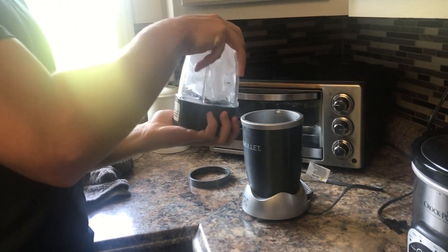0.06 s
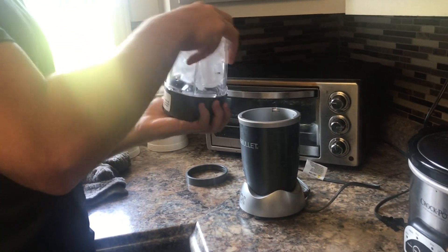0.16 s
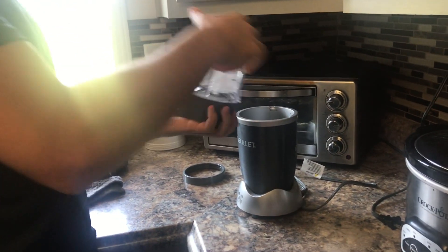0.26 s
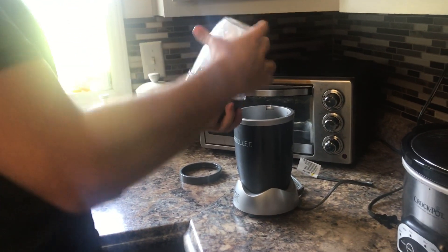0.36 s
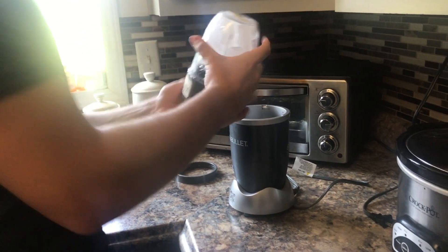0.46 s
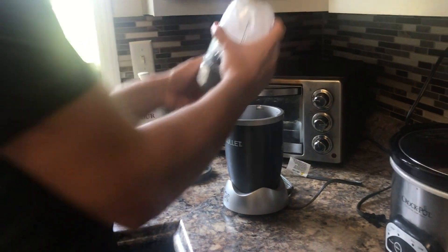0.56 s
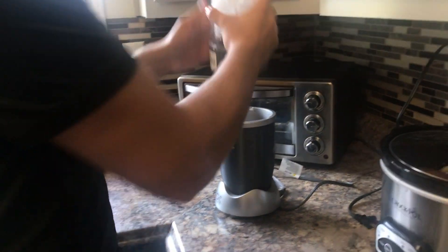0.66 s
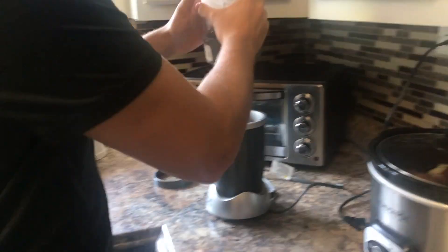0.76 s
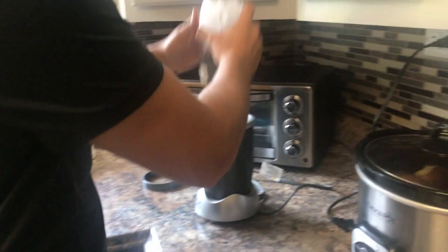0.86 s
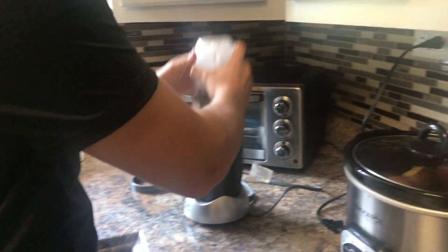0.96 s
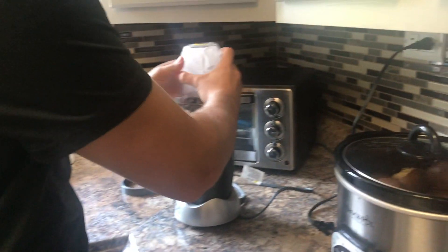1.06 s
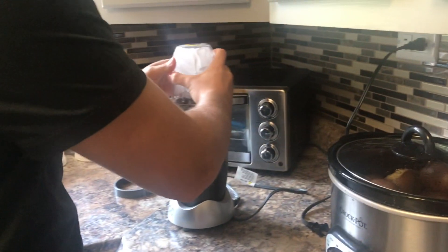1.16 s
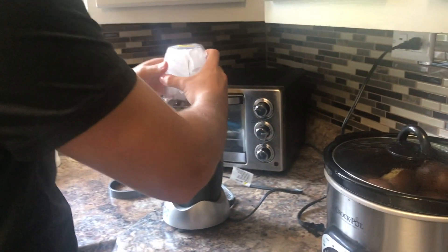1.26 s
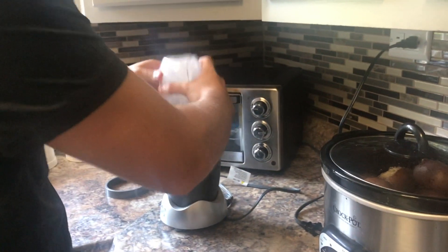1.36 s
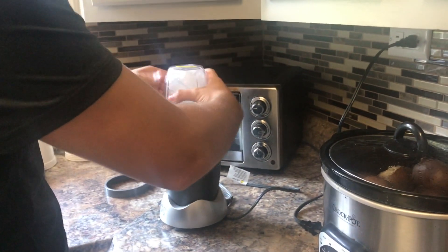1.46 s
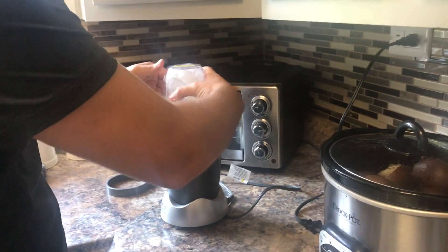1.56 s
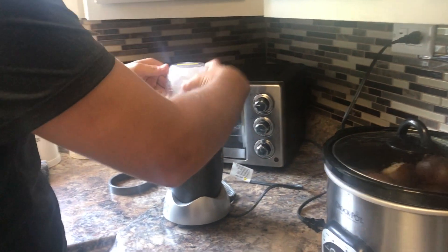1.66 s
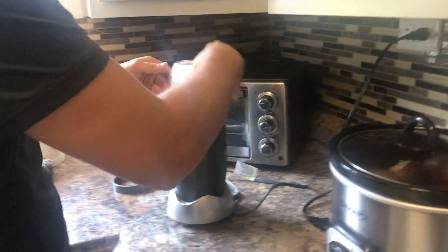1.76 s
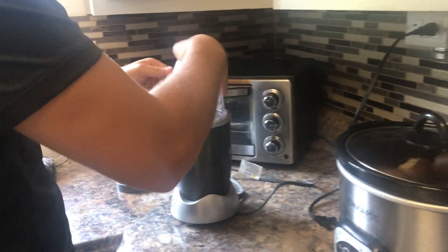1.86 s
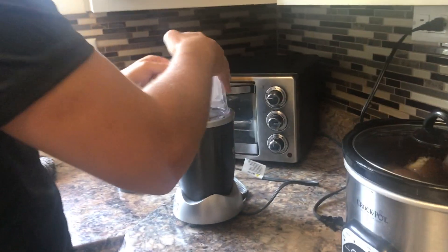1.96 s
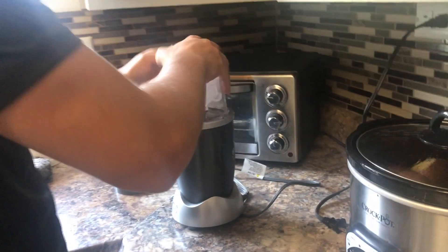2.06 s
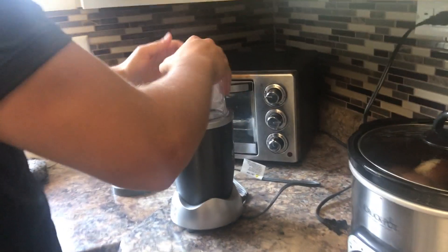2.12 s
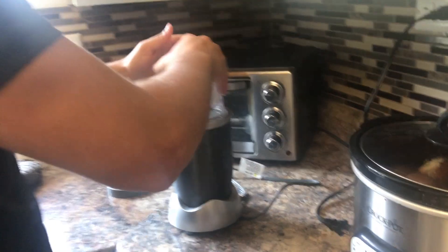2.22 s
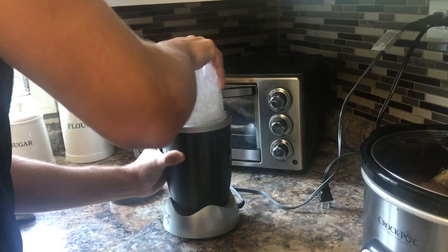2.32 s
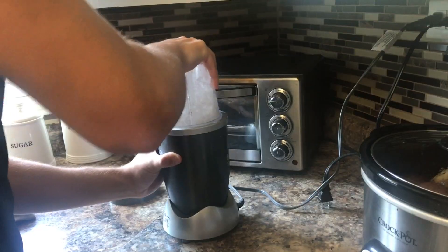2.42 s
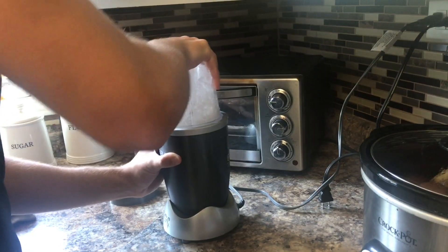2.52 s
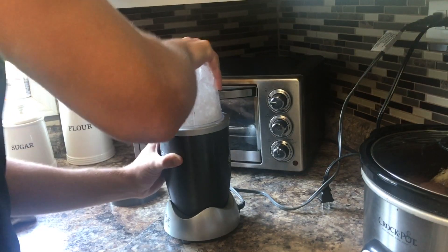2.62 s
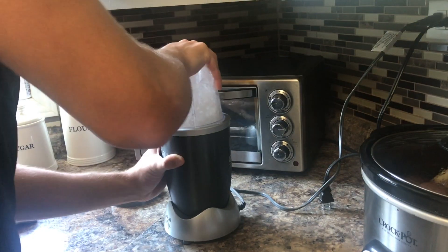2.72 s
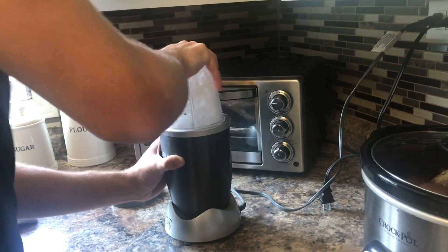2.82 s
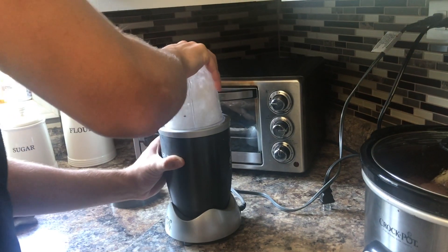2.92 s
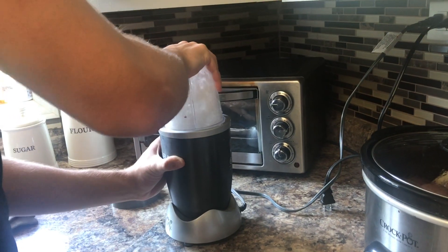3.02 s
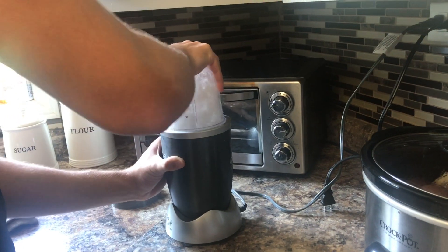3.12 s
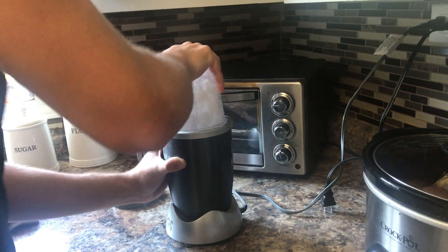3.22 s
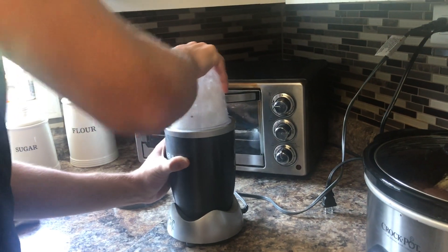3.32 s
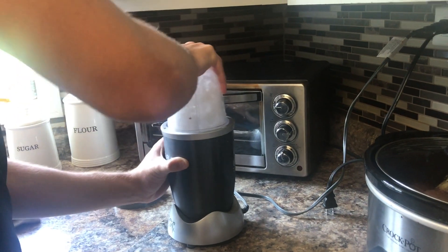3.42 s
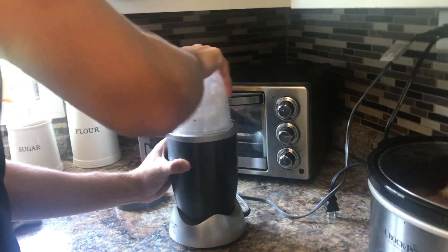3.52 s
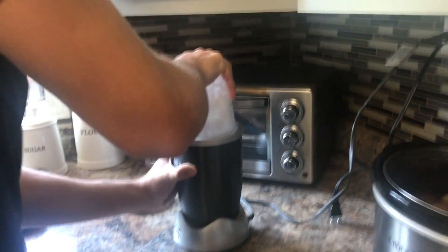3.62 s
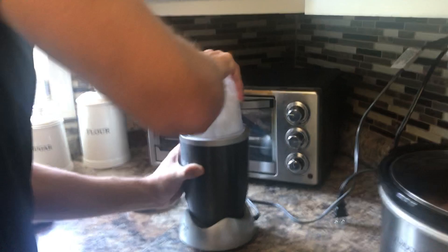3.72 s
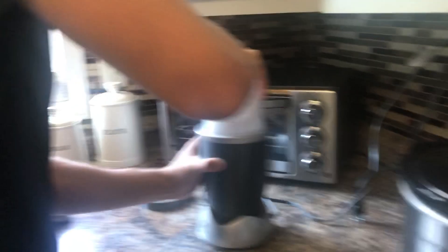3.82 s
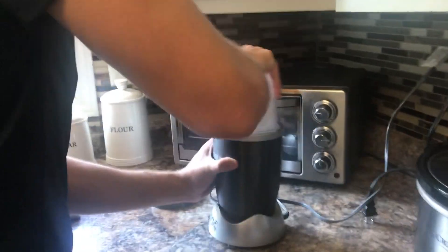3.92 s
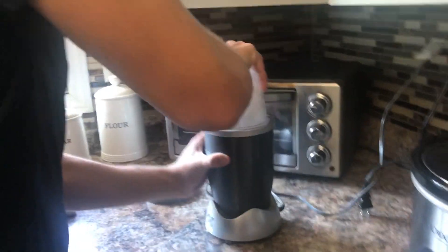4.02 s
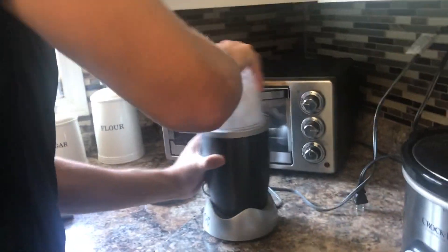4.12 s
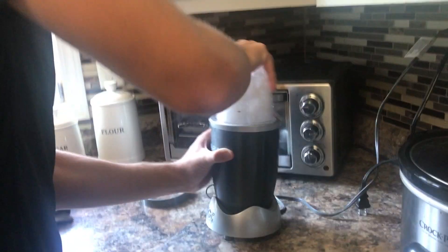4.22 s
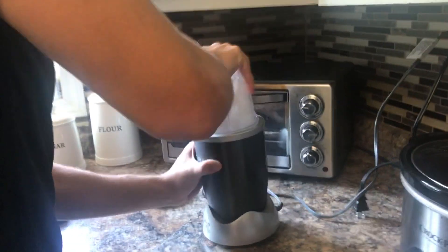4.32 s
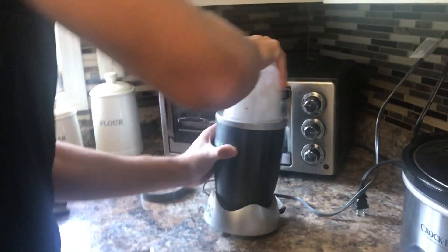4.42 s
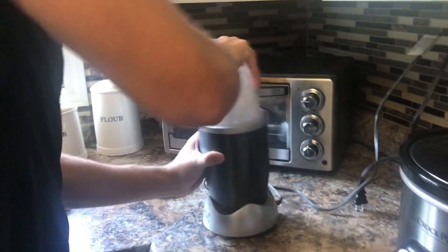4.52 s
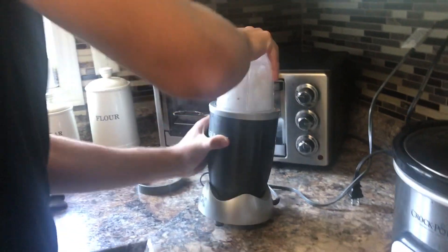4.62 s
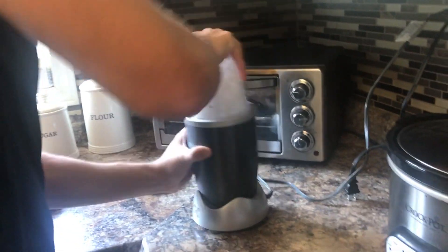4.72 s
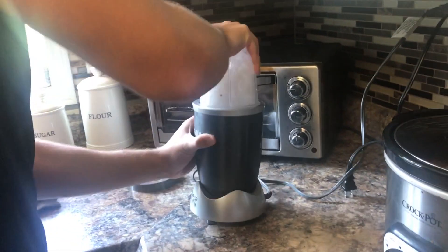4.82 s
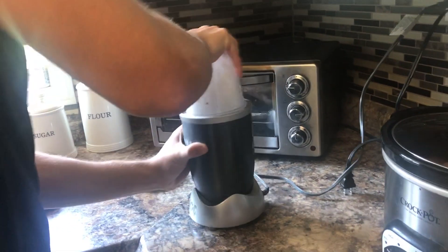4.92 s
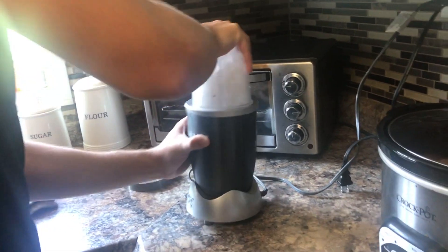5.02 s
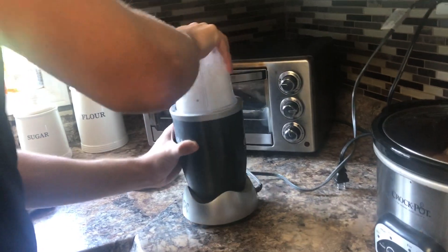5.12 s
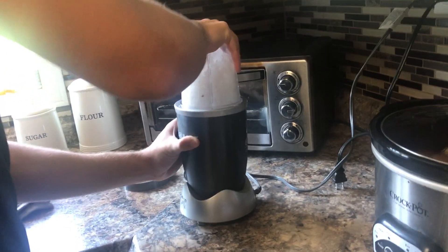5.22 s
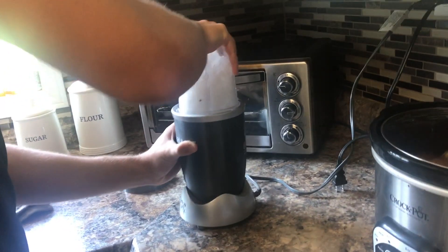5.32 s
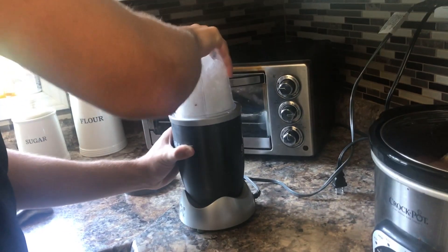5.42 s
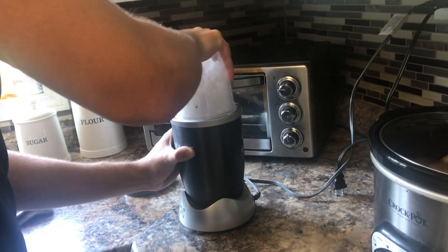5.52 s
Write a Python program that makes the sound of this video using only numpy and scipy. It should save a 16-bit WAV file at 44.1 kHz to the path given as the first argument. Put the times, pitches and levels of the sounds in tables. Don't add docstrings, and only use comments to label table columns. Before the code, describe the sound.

A quiet start: loose ice clacking in a cup, hands rubbing plastic, then sharp knocks and dull booms as it is seated on a small blender. A brief dip in sound precedes the last clicks. Then the motor roars for the rest, blades smashing cubes in irregular bursts, over buzzing plastic and fan noise. Reflective kitchen, one nearby phone microphone, slightly squashed at the loudest peaks.

```python
import sys
import numpy as np
from scipy import signal
from scipy.fft import rfft, irfft
from scipy.io import wavfile
from scipy.ndimage import uniform_filter1d

SR = 44100
rng = np.random.default_rng(int(sys.argv[2]) if len(sys.argv) > 2 else 0)


def inscribe(sig):
    pcm = np.round(np.clip(np.atleast_2d(sig).T, -1, 1) * 32767)
    wavfile.write(sys.argv[1], SR, pcm.astype(np.int16))


def decibels_to_gain(level_db):
    exponent = np.asarray(level_db, float) / 20
    return 10 ** exponent


N = 245777
TIME = np.arange(N) / SR
START_S, SPIN_UP_S = 2.833, 0.13
PUSH = np.hanning(40) / 20


def unit(x):
    return x / np.sqrt(np.mean(x ** 2))


def band(x, lo_hz, hi_hz):
    edges_hz = [lo_hz, min(hi_hz, 0.45 * SR)]
    return signal.sosfilt(signal.butter(2, edges_hz, "band", fs=SR, output="sos"), x)


def resonances(x, peaks):
    out = 0
    for k, (hz, width_hz, db) in enumerate(peaks):
        peak = signal.lfilter(*signal.iirpeak(hz, hz / width_hz, SR), x)
        out = out + (-1) ** k * decibels_to_gain(db) * peak / np.sqrt(width_hz)
    return unit(out)


def ring(x, modes):
    out = 0
    for hz, db, t60 in modes:
        pole = np.exp(2j * np.pi * hz / SR - np.log(1000) / (t60 * SR))
        out = out + decibels_to_gain(db) * signal.lfilter([1], [1, -pole], x).imag
    return out


def coloured(points):
    hz, db = np.transpose(points)
    f = np.arange(N // 2 + 1) * SR / N + 1
    shape = decibels_to_gain(np.interp(np.log(f), np.log(hz), db))
    return unit(irfft(rfft(rng.standard_normal(N)) * shape, N))


def walk(rate):
    k = int(SR / rate)
    return unit(uniform_filter1d(uniform_filter1d(rng.standard_normal(N), k), k))


def swells(table, col, rest_db):
    bumps = sum(decibels_to_gain(r[col]) * np.exp(-((TIME - r[0]) / r[1]) ** 2) for r in table)
    return 20 * np.log10(decibels_to_gain(rest_db) + bumps)


def add(out, s, sound):
    i = int(s * SR)
    out[i:i + len(sound)] += sound[:len(out) - i]


def clack(db, hz, treble_db, spread, grit, bite, ring_s, crack_s, rise_s, rebound, modes=()):
    t = np.arange(3000) / SR
    offsets = np.array([-0.68, -0.4, 0.04, -0.15, 0.43]) + 0.12 * rng.standard_normal(5)
    ratios = 2 ** (spread * offsets)
    if len(modes):
        ratios = np.array(modes) / hz * (1 + 0.016 * rng.standard_normal(len(modes)))
    body = np.zeros(len(t))
    for r in ratios:
        tone = np.sin(2 * np.pi * (hz * r * t + rng.random())) * np.exp(-t * r / ring_s)
        body += tone * decibels_to_gain(-5 * abs(np.log2(r))) / 2
    scrape = band(rng.standard_normal(len(t)), hz / (1 + spread), hz * (1 + 1.05 * spread))
    scrape *= np.exp(-t / ring_s)
    crack = band(rng.standard_normal(len(t)), 2600, 12500) * np.exp(-t / crack_s)
    crack += bite * band(crack, 4900, 7360) + 0.5 * band(crack, 12900, 17000)
    hit = decibels_to_gain(db) * (body + grit * scrape) + decibels_to_gain(treble_db) * crack
    hit *= 1 - np.exp(-t / rise_s)
    lags = (SR * (0.003 + 0.012 * rng.random(2))).astype(int)
    return hit + rebound * (np.roll(hit, lags[0]) + np.roll(hit, lags.sum()))


# (f/Hz, level/dB per Hz)
KITCHEN_TONE = [(18, -41), (30, -31.5), (64, 13), (93, -2.5), (280, -5.5), (600, -7), (666, -15),
                (760, -12.5), (2980, -26), (16000, -45)]


def kitchen_tone():
    return decibels_to_gain(-58) * coloured(KITCHEN_TONE)


# (t/s, peak level/dB, ring f/Hz, treble level/dB)
CUBES = [(0.0004, -20, 2030, -39), (0.0095, -34, 1940, -55), (0.0382, -27.5, 1950, -59),
         (0.0972, -37, 2300, -34.5), (.108, -41, 2100, -48), (0.116, -50, 2380, -53),
         (0.148, -23, 2220, -30.5), (0.165, -51, 1770, -46), (0.191, -37, 1840, -40),
         (0.2133, -32, 1710, -41), (0.247, -30, 1750, -37), (0.26, -28.5, 1850, -38),
         (0.2994, -43, 1700, -50), (0.3368, -41, 1710, -51), (0.4892, -36.5, 1630, -49),
         (0.5035, -28, 2140, -34.5)]
CUP_WALL_HZ = [1106, 1346, 1813, 2010, 2187, 2410, 2560]


def cubes_in_cup():
    out = np.zeros(N)
    for s, db, hz, treble_db in CUBES:
        add(out, s, clack(db, hz, treble_db, spread=1.0, grit=0.74, bite=1.0, ring_s=0.0084,
                          crack_s=0.0034, rise_s=0.00053, rebound=0.2, modes=CUP_WALL_HZ))
    return out


# (t/s, half length/s, rub level/dB, level of weight on the counter/dB)
RUBS = [(0.005, 0.012, -61, -43), (0.19, 0.14, -59, -53), (0.53, 0.096, -55.5, -57), (0.8, 0.12, -58, -56),
        (1.25, 0.086, -69, -39), (1.4, 0.028, -78, -32), (1.44, 0.021, -52, -28),
        (1.495, 0.025, -43, -27.5), (1.6, 0.055, -66, -26.5), (1.76, 0.07, -72, -41.5),
        (1.98, 0.65, -77, -55), (2.36, 0.066, -74, -46), (2.49, 0.0092, -57.5, -36),
        (2.52, 0.061, -83, -52), (2.78, 0.12, -69, -40.5)]
# (f/Hz, width/Hz, level/dB)
PALM = [(1196, 390, -4), (1760, 210, 1), (2700, 250, -2), (3800, 540, 2), (4520, 500, -1.5),
        (6150, 400, -3)]
# (f/Hz, level/dB, t60/s)
COUNTER = [(56.3, 2, 0.24), (113.3, -0.5, 0.17)]
# (f/Hz, level/dB, t60/s)
BASE = [(192.6, 7.5, 0.14), (256, 15.5, 0.058), (364, 2.5, 0.12), (403, -3, 0.03), (635, -17, 0.047)]


def palms_on_cup():
    rub_db = swells(RUBS, col=2, rest_db=-76)
    rumble_db = swells(RUBS, col=-1, rest_db=-52.5)
    treble_db = -73 + (rub_db + 60.5)
    grain = band(rng.standard_normal(N) * decibels_to_gain(2.1 * walk(400)), 900, 7000)
    rub = decibels_to_gain(rub_db + 1.8 * walk(110)) * resonances(grain, PALM)
    rub += decibels_to_gain(treble_db + 2 * walk(37)) * unit(band(rng.standard_normal(N), 3460, 16000))
    weight = rng.standard_normal(N)
    shaken = unit(ring(weight, COUNTER)) + 0.56 * unit(ring(weight, BASE))
    rumble = decibels_to_gain(rumble_db - 7.5) * unit(shaken)
    return (rub + rumble) * (TIME < START_S)


# (t/s, peak level/dB, ring f/Hz, treble level/dB)
TICKS = [
    (0.4075, -46, 5840, -45),
    (1.872, -49, 5250, -47),
    (2.0542, -59, 3800, -65),
    (2.065, -50, 3750, -71),
    (2.7582, -26, 2910, -26.5),
    (2.7844, -45, 2980, -59),
]


def plastic_ticks():
    out = np.zeros(N)
    for s, db, hz, treble_db in TICKS:
        add(out, s, clack(db - 3, hz, treble_db, spread=0.14, grit=0.32, bite=-0.45, ring_s=0.0061,
                          crack_s=0.0029, rise_s=0.00039, rebound=0.14))
    return out


# (t/s, peak level/dB, ring f/Hz, treble level/dB, thud level/dB)
CLICKS = [(0.5519, -34.5, 1570, -44, -40), (0.573, -37, 2010, -59, -41), (0.583, -41, 1500, -58, -42.5),
          (1.052, -55, 2500, -58, -58), (1.1813, -33, 1000, -43, -32), (1.373, -43, 1610, -45, -57),
          (1.4198, -37.5, 1610, -49, -66), (1.4273, -39, 2300, -46, -64), (1.442, -41, 1920, -50, -66),
          (1.465, -36, 1940, -41, -60), (1.4875, -43, 2600, -32, -60), (1.6908, -49.5, 1290, -53, -41),
          (1.742, -43.5, 1070, -44.5, -46.5), (1.824, -55, 1110, -59, -47), (1.929, -51.5, 1710, -50, -56),
          (2.3164, -52, 1040, -66, -37), (2.372, -62.5, 1018, -65, -65), (2.4957, -47, 1220, -51, -52),
          (2.7848, -60, 2980, -56, -33.5)]


def cup_clicks():
    out, thud = np.zeros((2, N))
    for s, db, hz, treble_db, thud_db in CLICKS:
        add(out, s, clack(db, hz, treble_db, spread=0.77, grit=2.6, bite=0.76, ring_s=0.0059,
                          crack_s=0.003, rise_s=0.000333, rebound=0.32))
        add(thud, s, decibels_to_gain(thud_db - 8) * PUSH)
    return out + ring(thud, BASE)


# (t/s, peak level/dB, ring f/Hz, treble level/dB, thud level/dB)
KNOCKS = [
    (1.0817, -11.5, 1485, -21, -34),
    (1.514, -24, 1776, -22.5, -14),
    (2.1913, -31.5, 2740, -30, -22.5),
    (2.204, -25.5, 1067, -49, -45),
    (2.4913, -47, 1220, -52, -44),
    (2.7637, -45, 1460, -47, -55),
    (2.8417, -41, 2880, -18, -16.5),
]
# (f/Hz, level/dB, t60/s)
RIM = [(280, -17, 0.038), (405, 8.5, 0.059), (527, -8.5, 0.04), (774, -18, 0.019)]


def cup_knocks():
    out, rap = np.zeros((2, N))
    for s, db, hz, treble_db, thud_db in KNOCKS:
        add(out, s, clack(db, hz, treble_db, spread=1.306, grit=2.55, bite=-0.35, ring_s=0.007,
                          crack_s=0.0039, rise_s=0.00008, rebound=0.14))
        add(rap, s, decibels_to_gain(thud_db - 5.5) * PUSH)
    return out + band(ring(rap, RIM), 194, 1500)


# (t/s, thud level/dB, counter low mode level/dB, upper mode level/dB)
SETTLES = [
    (1.0896, -16.5, -14, -11),
    (1.5244, -18, -14.5, -36),
    (2.2022, -19.5, -28, -23),
    (2.4913, -49, -28, -33),
    (2.763, -63, -34, -39),
    (2.8437, -32, -30, -42),
]


def base_settles():
    thud, low, upper = np.zeros((3, N))
    for s, thud_db, low_db, upper_db in SETTLES:
        add(thud, s, decibels_to_gain(thud_db - 8) * PUSH)
        add(low, s, decibels_to_gain(low_db) * PUSH)
        add(upper, s, decibels_to_gain(upper_db) * PUSH)
    return ring(thud, BASE) + ring(low, COUNTER[:1]) + ring(upper, COUNTER[1:])


# (f/Hz, t60/s)
ROOM_T60 = [(150, 0.26), (600, 0.28), (2000, 0.38), (6000, 0.27), (14000, 0.18)]


def room(x, wet_db):
    out = x.copy()
    x = x[:int((START_S + 0.5) * SR)]
    t60_hz, t60_s = np.transpose(ROOM_T60)
    for hz in 150 * 2 ** (np.arange(14) / 2):
        lo_hz, hi_hz = hz / 2 ** 0.25, hz * 2 ** 0.25
        t60 = np.interp(np.log(hz), np.log(t60_hz), t60_s)
        keep = np.exp(-2 * np.log(1000) / (t60 * SR))
        energy = signal.lfilter([1 - keep], [1, -keep], band(x, lo_hz, hi_hz) ** 2)
        diffuse = unit(band(rng.standard_normal(len(x)), lo_hz, hi_hz))
        out[:len(x)] += decibels_to_gain(wet_db) * np.sqrt(energy) * diffuse
    return out


# (t/s, shaft f/Hz)
SHAFT = [(2.84, 121.2), (2.96, 149.2), (3.15, 213.3), (3.31, 213.5), (3.46, 227.8), (3.57, 219.7),
         (3.69, 206.8), (3.8, 220), (3.94, 226), (4.06, 208.4), (4.16, 218.7), (4.32, 256), (4.55, 266),
         (4.7, 274.4), (4.95, 281.4), (5.2, 281.2), (5.41, 263.4), (5.5, 238), (5.57, 239)]


def shaft():
    hz = np.interp(TIME, *np.transpose(SHAFT))
    turn = 2 * np.pi * np.cumsum(hz * (1 + 0.013 * walk(60) + 0.006 * walk(25))) / SR
    return hz, turn


# (t/s, half length/s, shaft tone level/dB, second order level/dB)
WOBBLES = [(2.95, 0.046, -37, -37), (3.06, 0.038, -29, -36), (3.16, 0.027, -25, -32),
           (3.37, 0.054, -29, -27), (3.58, 0.14, -39, -37), (3.78, 0.1, -34, -60), (4.1, 0.053, -30.5, -23),
           (4.23, 0.065, -30, -31), (4.38, 0.06, -28.5, -23), (4.5, 0.051, -34, -27.5),
           (4.72, 0.037, -36, -21.5), (4.8, 0.045, -29, -43), (4.6, 0.054, -39, -34),
           (4.94, 0.059, -43, -26), (5.03, 0.074, -41, -32), (5.14, 0.053, -41, -27.5),
           (5.26, 0.042, -37, -32), (5.42, .1, -26.5, -35.5), (5.52, 0.05, -31, -38)]


def shaft_tones(turn):
    first_db = swells(WOBBLES, col=2, rest_db=-36.5) + 3.4 * walk(74) + 1.35 * walk(29)
    second_db = swells(WOBBLES, col=-1, rest_db=-39.5) + 1.9 * walk(39)
    return decibels_to_gain(first_db) * np.sin(turn) + decibels_to_gain(second_db) * np.sin(2 * turn)


# (f/Hz, width/Hz, level/dB)
PANELS = [(1070, 230, -7), (2113, 205, 4.5), (3000, 150, -2.5)]
# (t/s, half length/s, level/dB)
SINGS = [(3.26, 0.038, -39), (3.45, 0.094, -32.5), (3.63, 0.057, -40), (3.85, 0.066, -34), (4.0, 0.06, -39),
         (4.4, .2, -39), (4.75, 0.081, -30), (4.93, 0.057, -27.5), (5.1, 0.1, -26), (5.28, 0.04, -32),
         (5.39, 0.072, -45)]


def panel_whine(hz):
    steady = 2 * np.pi * np.cumsum(hz * (1 + 0.018 * walk(90) + 0.006 * walk(30))) / SR
    orders = np.zeros(N)
    for k in range(4, 14):
        slot_db = 6 * (k == 10)
        orders += decibels_to_gain(2.5 * walk(70) + slot_db) * np.sin(k * steady)
    sung = resonances(resonances(orders, PANELS), PANELS)
    fade_in = np.clip((TIME - START_S) / SPIN_UP_S - 1, 0, 1)
    return decibels_to_gain(swells(SINGS, col=2, rest_db=-47)) * sung * fade_in


# (f/Hz, level/dB per Hz)
AIR = [(350, -9.5), (600, -6), (880, -10), (1070, -2.5), (1190, -8.5), (1870, -6.5), (2110, -6),
       (2930, -5.5), (4870, -12), (9390, -19.5), (10500, -21.5), (13200, -24), (15800, -26.5)]


def cooling_air(hz, turn):
    fan = decibels_to_gain(-27 + 14.5 * np.log2(hz / 220))
    first_smash = decibels_to_gain(-21) * np.exp(-np.maximum((TIME - START_S) / 0.097, 0) ** 3)
    flutter = decibels_to_gain(0.7 * walk(30))
    return (fan + first_smash) * flutter * coloured(AIR) * (1 + 0.14 * np.cos(turn))


def ice_blows():
    swarm = 1.8 * walk(90)
    chip_db = 1.8 * np.minimum(rng.exponential(size=N), 2.5) + swarm
    chips = (rng.random(N) < 7000 / SR) * rng.standard_normal(N) * decibels_to_gain(chip_db)
    shake = rng.standard_normal(N) * decibels_to_gain(0.7 * swarm + 1.3 * walk(25))
    return chips, shake


# (t/s, half length/s, level/dB)
TUMBLES = [(2.858, 0.011, -13), (2.895, 0.024, -8.5), (3.05, 0.19, -21), (3.2, 0.055, -28),
           (3.43, 0.083, -22), (3.76, 0.047, -14.5), (3.72, .02, -40), (3.84, 0.025, -35),
           (4.18, 0.11, -15.5), (4.265, 0.01, -15.5), (4.44, 0.032, -14), (4.54, 0.037, -10.5),
           (4.66, 0.036, -16), (4.78, 0.052, -13.5), (4.92, .05, -23), (5.04, 0.062, -13.5),
           (5.16, 0.038, -16), (5.31, .03, -26), (5.4, 0.065, -41), (5.57, 0.014, -17)]
# (f/Hz, width/Hz, level/dB)
CUP = [(2134, 17, -14.5), (2740, 410, 6), (3110, 790, 6), (4200, 650, 1.5), (5420, 1900, -2)]
WALL = [(3000, 140, 0)]
RASP = [(5440, 230, 0)]
# (t/s, half length/s, level/dB)
WALL_RINGS = [
    (3.1, 0.13, -54),
    (4.54, .03, -24),
    (4.79, 0.047, -27),
    (4.95, 0.093, -35),
    (5.13, 0.059, -28),
]
# (t/s, half length/s, level/dB)
RASPS = [
    (2.96, 0.062, -34),
    (3.1, .08, -49),
    (3.42, .05, -40),
    (4.16, 0.053, -41),
    (5.32, .03, -34),
]


def ice_on_cup(chips, cup_db):
    out = decibels_to_gain(cup_db - 9) * resonances(chips, CUP)
    out += decibels_to_gain(swells(WALL_RINGS, col=2, rest_db=-40)) * resonances(chips, WALL)
    return out + decibels_to_gain(swells(RASPS, col=2, rest_db=-49)) * resonances(chips, RASP)


# (t/s, half length/s, strength level/dB, counter level/dB)
JOLTS = [(2.87, 0.053, -19, -33), (3.07, 0.087, -22.5, -32), (3.35, 0.014, -27, -38),
         (3.46, 0.051, -31, -38), (3.59, 0.053, -44, -40), (3.755, 0.035, -27.5, -35),
         (3.87, 0.028, -26, -44), (4.1, 0.078, -32.5, -37), (4.26, 0.058, -33, -28.5),
         (4.41, 0.031, -37, -21), (4.49, 0.027, -29, -20), (4.67, 0.085, -36, -28),
         (4.86, 0.038, -34, -24.5), (5.05, 0.04, -32.5, -27.5), (5.25, .05, -40.5, -32)]
# (f/Hz, width/Hz, level/dB)
HOUSING = [(166, 260, -0.5), (247.3, 42, 5), (354, 46, 6), (427, 42, 6.5), (518, 61, 4.5),
           (657.6, 15, -1.5), (745, 150, -14.5), (1070, 110, 2), (1390, 200, -2), (2010, 45, -5),
           (2018, 120, 0)]
# (f/Hz, width/Hz, level/dB)
LID = [(2100, 120, 0)]
# (t/s, half length/s, level/dB)
LID_BUZZES = [
    (3.3, 0.085, -41),
    (3.7, .2, -41),
    (4.93, .05, -34),
    (5.1, .08, -37),
    (5.34, 0.096, -32.5),
]


def machine_shaken(shake, cup_db):
    mains_db = swells(JOLTS, col=2, rest_db=-54.5)
    counter_db = swells(JOLTS, col=-1, rest_db=-50)
    housing_db = -23.5 + 0.25 * (mains_db + 35) + 0.47 * (cup_db + 21)
    out = decibels_to_gain(housing_db - 5) * resonances(shake, HOUSING)
    out += decibels_to_gain(swells(LID_BUZZES, col=2, rest_db=-47)) * resonances(shake, LID)
    hum = np.sin(2 * np.pi * np.cumsum(118 + 4 * walk(34)) / SR)
    out += decibels_to_gain(mains_db + 2.1 * walk(30)) * hum
    return out + decibels_to_gain(counter_db) * unit(ring(shake, COUNTER[:1]))


# (t/s, peak level/dB, ring f/Hz, treble level/dB)
CRUNCH = [(2.855, -2, 3200, -5.5), (2.8768, 4, 2570, -2.5), (2.9064, 3.5, 3260, -6.5),
          (2.953, -2.5, 2990, -24), (3.042, 3.5, 3050, -33), (3.103, 2.5, 3320, -29),
          (3.128, -14, 3380, -12.5), (3.1568, 0, 2650, -25), (3.196, -3, 3000, -23),
          (3.221, 2.5, 3180, -16), (3.269, -16, 2100, -18), (3.4028, -2, 2440, -25),
          (3.4406, -1.5, 2900, -33), (3.483, -1.5, 2940, -16), (3.7727, -1, 2548, -43),
          (3.8055, 3.5, 2892, -35), (4.112, -1, 2860, -36), (4.1381, 0.5, 2815, -33),
          (4.177, 4.5, 3280, -14), (4.1969, 6, 2750, -20), (4.2495, 6.5, 3093, -21),
          (4.338, 3.5, 3270, -13), (4.4241, 3, 2845, -22), (4.533, -1, 3023, -25), (4.6418, 4, 2765, -26),
          (4.7638, 0, 2740, -14), (4.97, 0, 3030, -17), (5.0208, 2, 3000, -15), (5.1514, 6, 2750, -7),
          (5.3066, -2.5, 3200, -12), (5.3564, 1.5, 3380, -26)]
# (t/s, peak level/dB, ring f/Hz, treble level/dB)
MORE_CRUNCHES = [(2.8854, -15, 2570, -18), (2.8928, -10, 2985, -13), (2.9124, -15, 2780, -21),
                 (3.0113, -8, 3050, -34), (3.0644, -6.5, 2700, -30), (3.3952, -11, 2790, -27),
                 (3.459, -9, 2930, -25), (3.7194, -11, 2980, -29), (3.7394, -9, 2890, -26),
                 (3.7874, -10, 2600, -31), (4.0647, -15, 2840, -28), (4.1375, -4, 2790, -32),
                 (4.208, -12, 2500, -27), (4.2676, -6.5, 2842, -29), (4.4424, -7, 2540, -26),
                 (4.4912, -8, 3018, -28), (4.5044, -9, 2940, -22), (4.5434, 0, 2969, -28),
                 (4.5629, -3, 2730, -27), (4.6594, -11, 4150, -24), (4.6894, -7, 2964, -27),
                 (4.7244, -21, 2770, -27), (4.7894, -1.5, 3380, -20), (4.8103, -5, 2840, -22),
                 (4.8446, -5, 2960, -22), (4.8867, -8, 3040, -28), (4.9282, -9, 3020, -27),
                 (4.9836, -7, 2720, -22), (5.039, -9, 3030, -22), (5.0744, -7, 3030, -25),
                 (5.1194, -11, 2847, -21), (5.1581, -6, 3020, -24), (5.179, -11, 2639, -25),
                 (5.209, -8, 2830, -23), (5.3294, -21, 2963, -25), (5.3961, -15, 3250, -27),
                 (5.422, -11, 2910, -27), (5.5644, -18, 2970, -22)]


def cubes_crunched():
    out = np.zeros(N)
    for s, db, hz, treble_db in CRUNCH:
        add(out, s, clack(db - 12.5, hz, treble_db - 6, spread=0.3, grit=2.33, bite=1.0, ring_s=0.0048,
                          crack_s=0.006, rise_s=0.0019, rebound=0.29))
    for s, db, hz, treble_db in MORE_CRUNCHES:
        add(out, s, clack(db - 6.5, hz, treble_db - 1, spread=0.272, grit=2.2, bite=1.0, ring_s=0.0049,
                          crack_s=0.004, rise_s=0.0015, rebound=0.26))
    return out


def ice():
    chips, shake = ice_blows()
    cup_db = swells(TUMBLES, col=2, rest_db=-30)
    churn = ice_on_cup(chips, cup_db) + machine_shaken(shake, cup_db)
    return churn * np.clip((TIME - START_S) / 0.015, 0, 1) + cubes_crunched()


def echoes(x, t60, wet_db):
    t = np.arange(SR // 4) / SR
    tail = rng.standard_normal(len(t)) * decibels_to_gain(-60 * t / t60) * (t > 0.001)
    tail /= np.sqrt(np.sum(tail ** 2))
    return x + decibels_to_gain(wet_db) * signal.fftconvolve(x, tail)[:N]


def scene():
    hands = cubes_in_cup() + palms_on_cup() + plastic_ticks() + cup_clicks() + cup_knocks() + base_settles()
    running = np.clip((TIME - START_S) / 0.014, 0, 1)
    hz, turn = shaft()
    tones = shaft_tones(turn) + panel_whine(hz)
    roar = echoes(cooling_air(hz, turn) * running + ice(), t60=0.6, wet_db=-10)
    mono = kitchen_tone() + room(hands, wet_db=-6.5) + roar + tones * running
    return np.array([mono, mono])


def band_limit(x):
    return signal.sosfilt(signal.butter(12, 16490, fs=SR, output="sos"), x)


def record(dry):
    heard = signal.sosfilt(signal.butter(6, 45, "high", fs=SR, output="sos"), dry)
    heard -= 0.5 * band(heard, 9840, 10860)
    heard += decibels_to_gain(-73) * rng.standard_normal(N)
    dip = np.clip(abs(TIME - 2.407) / 0.026, decibels_to_gain(-30), 1)
    soft = np.tanh(0.6 * heard * dip) / 0.6
    top = signal.ellip(9, 0.2, 30, 15800, fs=SR, output="sos")
    mix = signal.sosfilt(top, soft)
    return band_limit(mix)


dry = scene()
out = record(dry)
inscribe(out)
```